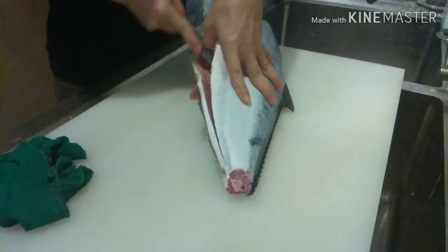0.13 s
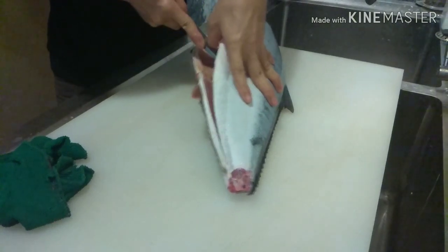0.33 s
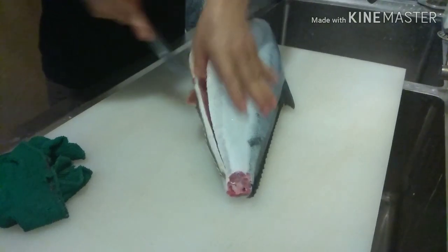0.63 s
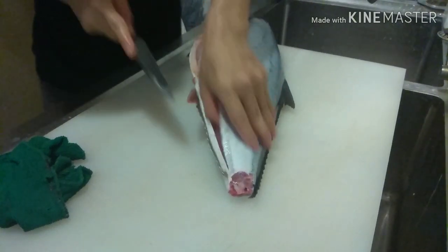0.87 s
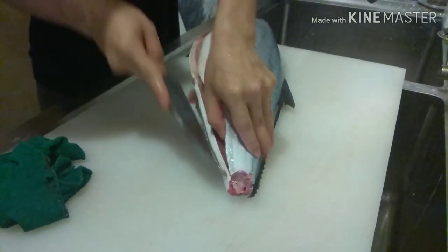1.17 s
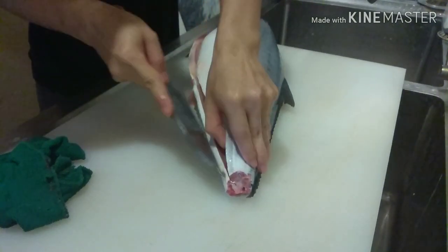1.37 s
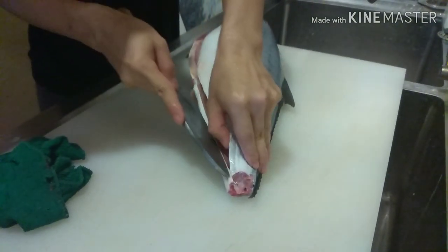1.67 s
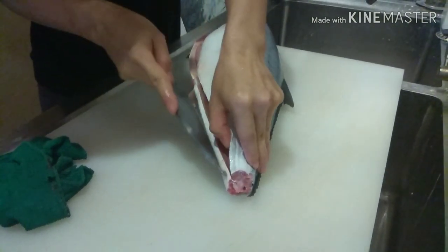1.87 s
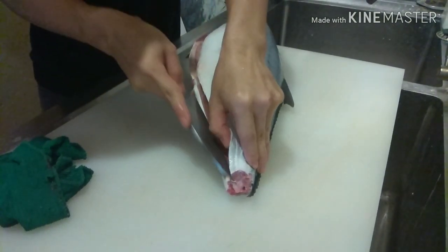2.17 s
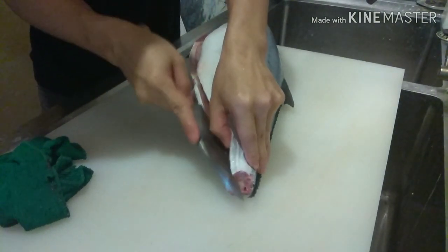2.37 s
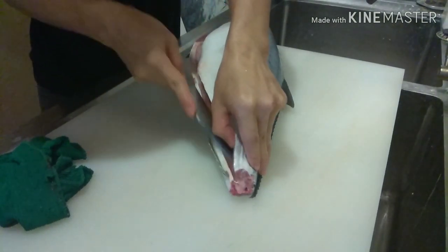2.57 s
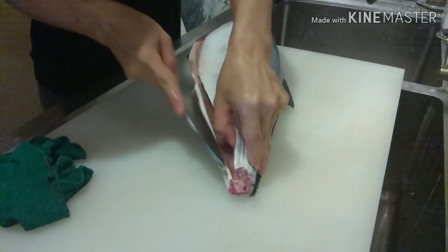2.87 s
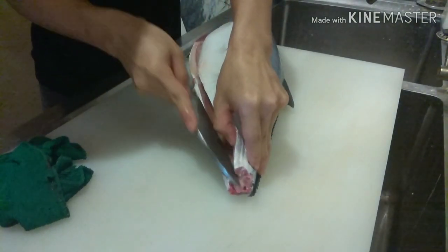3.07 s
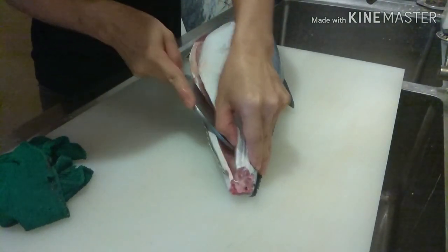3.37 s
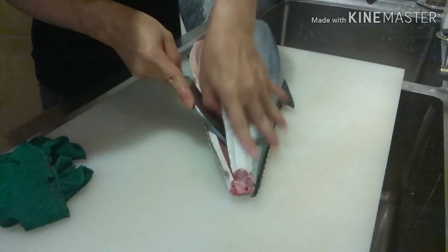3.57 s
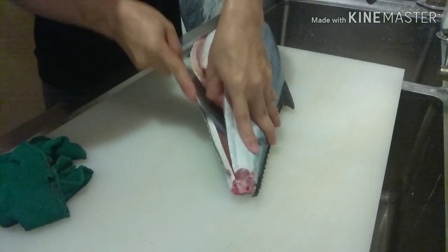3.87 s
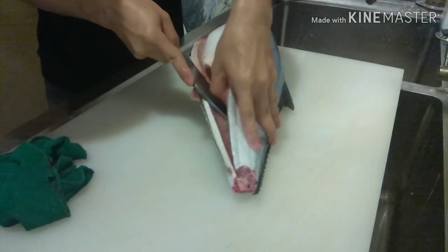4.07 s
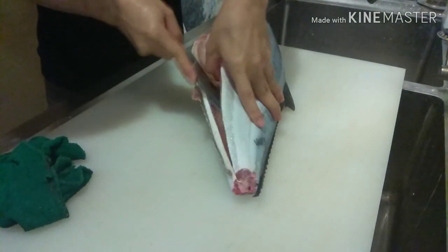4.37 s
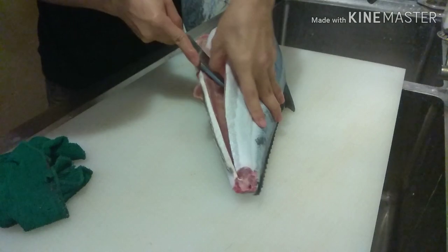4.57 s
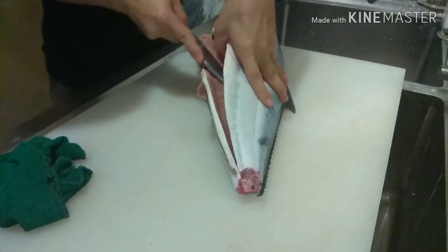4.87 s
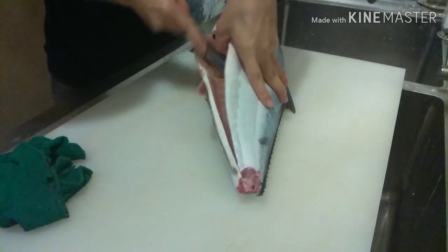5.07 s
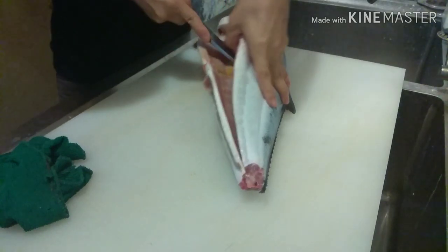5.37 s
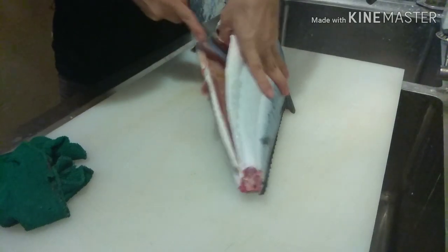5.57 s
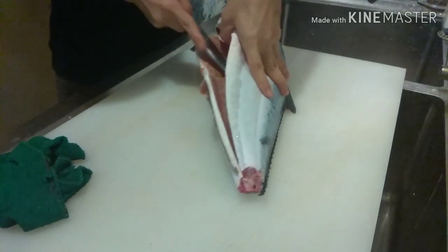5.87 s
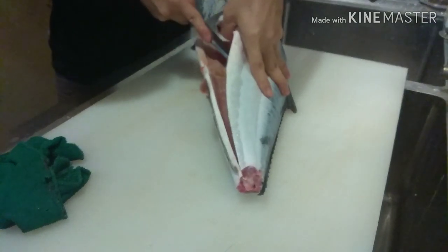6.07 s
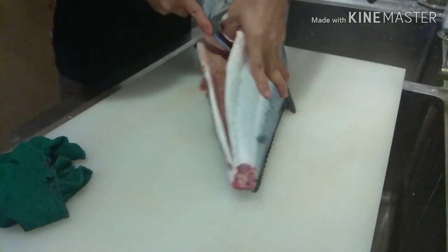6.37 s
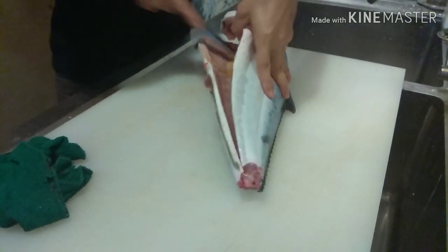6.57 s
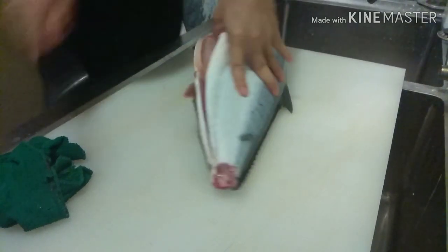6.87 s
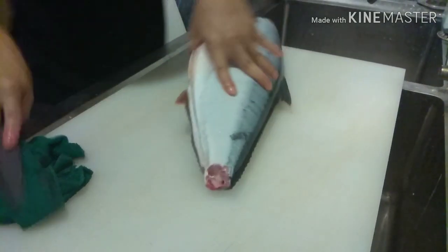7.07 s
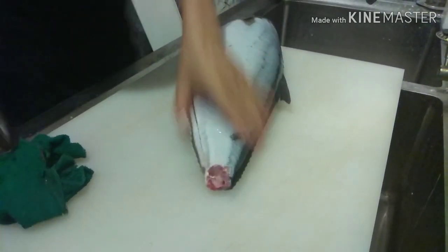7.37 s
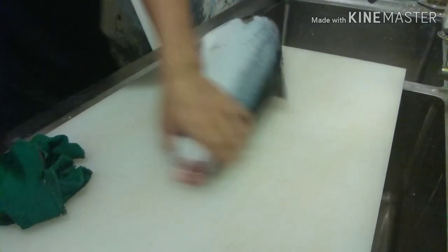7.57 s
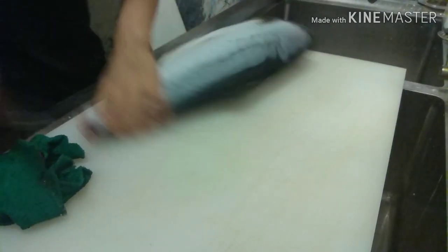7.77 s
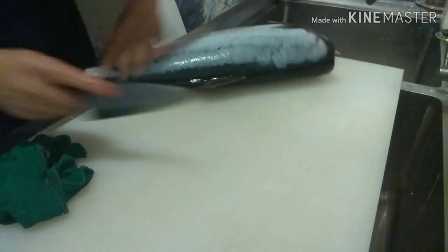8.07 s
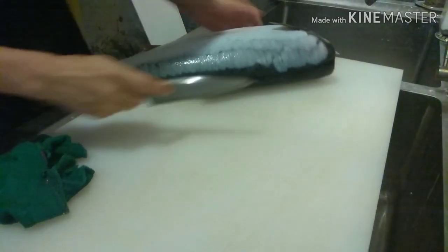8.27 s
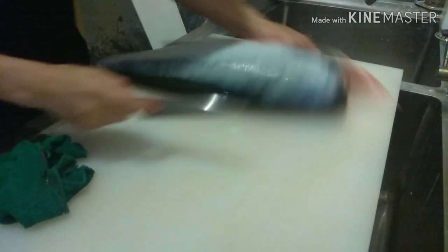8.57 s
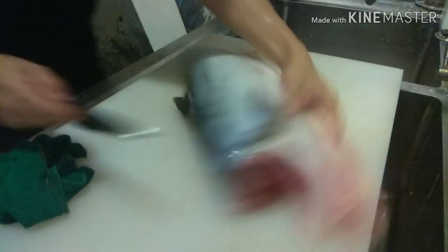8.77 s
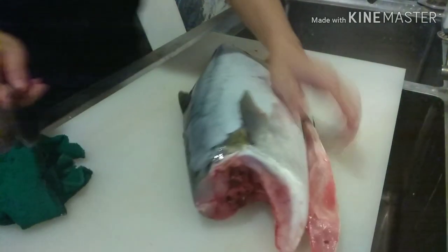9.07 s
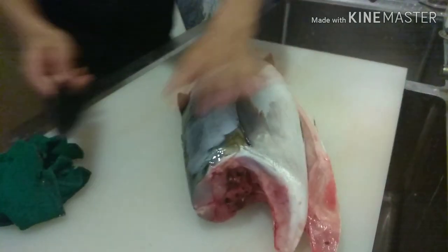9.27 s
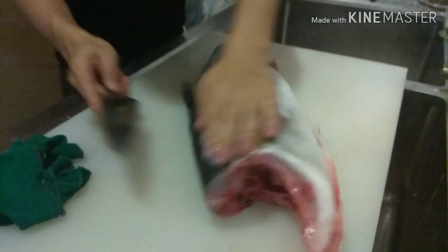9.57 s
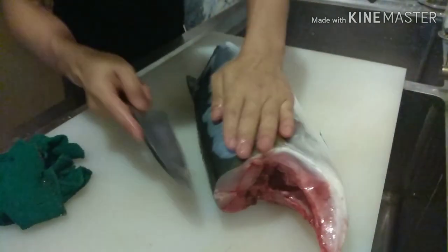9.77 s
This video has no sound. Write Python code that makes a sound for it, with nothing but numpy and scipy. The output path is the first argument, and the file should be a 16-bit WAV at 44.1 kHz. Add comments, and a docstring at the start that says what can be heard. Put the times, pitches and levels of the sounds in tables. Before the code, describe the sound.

Close stereo sound of a fish being boned on a plastic board in a hard-walled kitchen. Crisp bone snaps and short rasping knife strokes come in clusters, with soft low thuds and tiny knocks. A heavier thump is followed by wet skin squeaking as the fish is turned, then faint scrapes. Steady hiss, low rumble and thin hum continue throughout.

```python
"""A fish is boned on a plastic board in a hard-walled kitchen, heard close by two microphones.
Throughout, shaped noise gives hiss and rumble, thin resonances a hum and a whistle that comes and goes.
From the start noise bursts snap bone, torn noise scrapes along the ribs and counter modes thud below;
short damped tones knock and chirp here and there. The heaviest thud falls just after 7 s, wavering tones
squeak as wet skin is turned near 8 s, then faint scrapes follow. Sparse echoes carry the near work."""
import sys
import numpy as np
from scipy import signal
from scipy.fft import irfft
from scipy.io import wavfile
from scipy.ndimage import uniform_filter1d

SR = 44100
rng = np.random.default_rng(int(sys.argv[2]) if len(sys.argv) > 2 else 0)


def dump(signal):
    """Clip the signal to [-1, 1] and save it as 16-bit WAV at the path in sys.argv[1]."""
    limited = np.clip(np.atleast_2d(signal).T, -1, 1)
    pcm = np.round(limited * 32767).astype(np.int16)
    wavfile.write(sys.argv[1], SR, pcm)


def to_linear_factor(level_db):
    """Convert decibel levels (scalar or array-like) to linear amplitude factors."""
    exponent = np.asarray(level_db, float) / 20
    return 10 ** exponent


N = 437472

# spectrum of the room's hiss and rumble: [f/Hz, relative level/dB per Hz]
AIR_SPECTRUM = [(24, -65), (40, -35.5), (69, -27), (203, -5), (260, -9.5), (302, -12), (485, -16),
                (1490, -26), (2280, -23.5), (2590, -27), (4370, -21), (5750, -9), (7750, -1.5), (9710, 1),
                (15600, -13)]
# resonances and hollows on that spectrum: [f/Hz, width/Hz, level against the air/dB]
AIR_RESONANCES = [(212, 40, 4), (2360, 120, 4), (3820, 250, 4), (4750, 140, 6), (5230, 110, 8),
                  (5880, 350, 6), (7150, 400, 5), (4180, 220, -5), (4480, 200, -4), (4980, 250, -8),
                  (5390, 220, -12), (6390, 300, -7), (6770, 90, -9), (7800, 560, -22), (9600, 500, 4),
                  (10880, 130, -9), (11700, 1200, 5), (14570, 130, -10)]
# slow swell of the treble hiss: [t/s, level/dB]
HISS_SWELL = [(0.0, 2.5), (0.47, -0.2), (1.19, 1), (1.46, -0.33), (4.4, 0), (7.68, -0.6), (7.98, 1),
              (8.34, -0.7), (8.79, 0.5), (9.92, -1)]
# depth of the flicker in narrow patches of the air: [f/Hz, rms level/dB]
AIR_FLUTTER = [(1000, 1.2), (2200, 3.2), (5500, 3.2), (8000, 1.5), (15000, 1.5)]
# likeness of the steady sounds at the two microphones: [f/Hz, correlation]
LIKENESS = [(60, 0.98), (250, 0.97), (500, 0.48), (1200, 0.11), (4000, 0.45), (9000, 0.05), (12000, 0.3),
            (15000, 0.15)]
# balance of the steady sounds: [f/Hz, left minus right level/dB]
BALANCE = [(60, 11.5), (110, -1.5), (200, 0), (380, 4), (700, -0.5), (1290, 1), (2380, 0.5), (4400, 4.5),
           (8120, -2), (15000, 13.5)]
# dead spot at the right microphone: [f/Hz, width/Hz, level/dB]
RIGHT_DEAD_SPOT = (12630, 350, -18)
# thin wavering lines of the kitchen appliances: [f/Hz, width/Hz, level/dB]
APPLIANCE_LINES = [(212, 8, -62), (300, 6, -66), (378, 7, -70), (450, 5, -75), (529, 5, -78), (598, 6, -78),
                   (620, 5, -78), (692, 5, -82), (4759, 30, -78), (5873, 30, -72), (7160, 30, -70),
                   (8312, 30, -66), (8839, 30, -65), (8925, 30, -65), (9480, 40, -59), (9668, 50, -58),
                   (10020, 40, -55), (11096, 22, -63), (11337, 25, -60), (11482, 25, -60), (11767, 22, -59),
                   (11906, 25, -58), (12144, 30, -57), (13214, 40, -63)]
# a thin whistle that comes and goes, as on the left: [t/s, level/dB]
WHISTLE_LEVEL = [(0.0, -72), (0.4, -70), (0.55, -87), (3.4, -82), (3.8, -73), (5.0, -74.5), (5.9, -75.5),
                 (6.8, -66.5), (7.2, -75), (8.2, -66), (8.85, -79), (9.0, -66.5), (9.92, -66.5)]
# how fast the room's echoes die: [f/Hz, t60/s]
ROOM_DECAY = [(200, 0.029), (2000, 0.19), (6000, 0.16), (14000, 0.048)]
# modes of the steel counter: [f/Hz, relative level/dB, t60/s]
COUNTER_MODES = [(35.8, 29, 0.37), (68.6, -2, 0.32), (114.8, 1, 0.38), (132.1, 2, 0.34), (169.2, 2.5, 0.22),
                 (190, 2, 0.24), (213.2, 6, 0.17), (272, 4, 0.099)]
# thuds through the counter: [t/s, peak level/dB, f around which it rings/Hz]
COUNTER_THUDS = [(0.055, -33, 213), (0.097, -37, 210), (0.3, -42, 159), (0.714, -38.5, 198),
                 (1.68, -44, 204), (2.649, -37.5, 201), (4.018, -50, 124), (4.067, -46, 130),
                 (4.22, -39.5, 220), (4.274, -38, 204), (4.393, -38.5, 190), (4.453, -42.5, 197),
                 (4.65, -39.5, 126), (5.16, -44, 175), (5.633, -41.5, 197), (6.202, -39, 196),
                 (6.398, -48.5, 121), (6.676, -47.5, 197), (7.193, -27, 129), (7.237, -32, 129),
                 (7.277, -37, 157), (7.36, -44, 126), (9.514, -47, 207)]
# small pitched knocks, chirps and whistle blips: [t/s, level the decay starts from/dB, f/Hz, t60/s]
PITCHED_BLIPS = [(.2, -58, 1890, 0.12), (0.31, -46, 2200, 0.075), (0.768, -40, 1270, 0.057),
                 (1.095, -49, 3014, 0.16), (1.099, -52, 1780, 0.084), (1.235, -52, 2374, 0.089),
                 (1.739, -49, 1730, 0.068), (1.8, -58, 2160, 0.072), (2.35, -45.5, 2263, 0.22),
                 (2.55, -62, 2350, 0.47), (2.78, -49, 2315, 0.096), (2.599, -48, 1760, 0.053),
                 (3.33, -42.5, 2186, 0.074), (4.36, -52, 1777, 0.11), (4.684, -52, 2760, 0.063),
                 (5.14, -50, 2980, 0.077), (5.406, -50.5, 3400, 0.092), (5.41, -55, 2385, 0.3),
                 (5.71, -54.5, 3310, 0.1), (5.929, -55, 2360, 0.47), (6.391, -35.5, 1440, 0.023),
                 (7.19, -51, 850, 0.054), (8.7, -49.5, 2150, 0.2), (8.113, -27, 390, 0.021)]
# squeaks of wet skin over plastic, one curve each: [t/s, f/Hz, level/dB, octave over the tone/dB]
SKIN_SQUEAKS = [
    [(7.712, 1970, -43, 2), (7.722, 2136, -40.5, -10), (7.735, 2440, -39, -22), (7.752, 2140, -56, -13),
     (7.775, 2430, -52, -16), (7.8, 2360, -63, -12)],
    [(7.85, 3037, -48, -9), (7.862, 3010, -34.5, -12), (7.878, 2934, -42.5, 7), (7.892, 2824, -45.5, 2),
     (7.91, 2930, -45, -12), (7.925, 3040, -39, -1), (7.94, 3125, -40, -3), (7.958, 3350, -37, -1),
     (7.978, 3580, -40.5, -15), (8.0, 3450, -38, -2), (8.02, 3454, -40.5, -2), (8.04, 3235, -39.5, 1),
     (8.06, 3120, -38, -12), (8.08, 3003, -44, 3), (8.11, 2710, -50.5, -6), (8.14, 2780, -64, -14),
     (8.2, 2900, -60, -8)],
]
# the open belly of the fish colours the blade: [f/Hz, width/Hz, level/dB]
BELLY = (3720, 950, 7)
# fixed dips in the spectrum of strokes and snaps: [f/Hz, width/Hz, level/dB]
STROKE_SNAP_DIPS = [(3010, 360, -8), (4164, 160, -12), (5460, 190, -12.5), (6250, 170, -10),
                    (7850, 270, -17.5)]
# strokes along flesh and ribs: [loudest t/s, nominal length/s, level/dB, centre f/Hz, spread/octaves]
BLADE_STROKES = [(0.07, 0.17, -52.5, 4950, 0.4), (0.633, 0.11, -41, 7900, 0.13),
                 (0.735, 0.15, -48.5, 5320, 0.26), (0.82, 0.13, -59, 5400, 0.24),
                 (0.898, 0.13, -41, 6320, 0.36), (1.05, 0.19, -48, 6400, 0.33),
                 (1.16, 0.16, -48.5, 6500, 0.45), (4.02, 0.054, -52, 6500, 0.48),
                 (4.62, 0.12, -40.5, 6540, 0.68), (5.149, 0.11, -45.5, 6460, 0.53),
                 (5.463, 0.063, -60, 6240, 0.53), (6.155, 0.064, -53, 4600, 0.27),
                 (6.39, 0.075, -41, 4600, 0.51), (8.72, 0.21, -52.5, 5430, 0.46),
                 (8.83, 0.13, -60, 5300, 0.27), (9.818, 0.14, -55, 4800, 0.28)]
# snaps of bone under the edge: [loudest t/s, level/dB, centre f/Hz]
BONE_SNAPS = [(0.052, -25, 12000), (0.112, -29.5, 10800), (0.305, -31, 9270), (0.713, -34, 9630),
              (2.522, -29, 12400), (2.715, -39, 12400), (3.344, -42, 10200), (3.997, -25.5, 11300),
              (4.5745, -36, 13000), (4.586, -26.5, 11300), (4.628, -27, 10000), (5.146, -29.5, 11500),
              (5.193, -34, 9900), (5.455, -29, 9900), (6.128, -32, 9000), (6.155, -34, 11700),
              (6.384, -24.5, 9000), (6.392, -35, 11500), (6.403, -36, 9000), (7.177, -30, 11650)]
# mute threshold against the usual level of neighbouring bands: [f/Hz, level/dB]
USUAL_THRESHOLD = [(800, -16), (1500, -5), (2600, 0), (5300, 1.5), (6800, -4), (7300, -5), (7800, -1),
                   (8300, -6), (13000, -6.5), (15000, -4)]
# mute threshold against the present level around the band: [f/Hz, level/dB]
PRESENT_THRESHOLD = [(1200, -30), (1600, -7), (2600, -3), (5400, -2.5), (5800, -5.5), (8200, -6),
                     (8600, -30)]

AIR_DB = -35.5  # rms of the whole air
LEFT_LAG = 3  # samples by which the left microphone hears the room later
HALVES = np.array([[.5], [-.5]])  # splits a left-minus-right level between the microphones
WHISTLE_HZ, WHISTLE_WIDTH_HZ, WHISTLE_FLICKER_DB = 1771, 44, 5
NUDGES, NUDGE_DB, NUDGE_HZ = 10, -47.5, 194  # faint thuds as the hands shift the fish
PITCH_WOBBLE, PATCH_SPREAD = 0.024, 0.05  # shares of the squeak's pitch
RASP_DB, RASP_WIDTH_SHARE = -6, 0.1  # rough noise under the squeak; width as a share of its mean pitch
RISE_SHARE, EDGE_DROP_DB = 0.4, -11  # share of a stroke before its peak, level at its nominal ends
DULLING_OCTAVES = 0.031  # fall of a stroke's centre over one nominal length
SNAP_RISE_S, SNAP_FALL_S, SNAP_OCTAVES = 0.0035, 0.0035, 0.4
CRUMBLE_SHARE, CRUMBLE_S = 0.24, 0.056
SNAP_LEFT_DB, SNAP_LEFT_DB_PER_OCTAVE = 7.5, 15  # left minus right at 10 kHz, and its slope
MASK_CAP_DB = 19  # sounds further than this over the usual level mute no more
EDGE_HZ = 15420  # top of the microphone's band


def evened(x):
    """Scales to rms 1."""
    return x / np.sqrt(np.mean(x ** 2) + 1e-20)


def read(points, hz):
    """Reads a spectrum on a log-frequency axis."""
    f, value = np.transpose(points)
    return np.interp(np.log(hz + 1), np.log(f + 1), value)


def resonance_db(rows, hz):
    """Sums resonance-shaped peaks and dips, in dB."""
    return sum(db / (1 + (2 * (hz - f) / width) ** 2) for f, width, db in rows)


def add(mix, s, sound):
    """Mixes a sound in at s seconds."""
    part = mix[..., max(round(s * SR), 0):][..., :sound.shape[-1]]
    part += sound[..., :part.shape[-1]]


def wander(count, size):
    """Slow chance of rms 1, smoothed twice over size samples."""
    return evened(uniform_filter1d(uniform_filter1d(rng.standard_normal(count), size), size))


def narrow(width_hz, turns):
    """Two channels of noise in one narrow resonance that follows the given phase turns; rms 1."""
    r = np.exp(-np.pi * width_hz / SR)
    drift = rng.standard_normal((2, len(turns))) + 1j * rng.standard_normal((2, len(turns)))
    drift = signal.lfilter([1], np.convolve([1, -r], [1, -r]), drift)
    return evened((drift * np.exp(2j * np.pi * turns)).real)


def air():
    """Random short-time spectra through fixed resonances; narrow patches flutter, the treble swells."""
    frames, hz = N // 512 + 5, np.fft.rfftfreq(2048, 1 / SR)
    a, b, c, d, patches = rng.standard_normal((frames, 1025, 5)).T
    patches = evened(uniform_filter1d(uniform_filter1d(patches, size=6, axis=0), size=8, axis=1))
    shape_db = read(AIR_SPECTRUM, hz) + resonance_db(AIR_RESONANCES, hz)
    s, swell_db = np.transpose(HISS_SWELL)
    swell_db = np.interp(np.arange(frames) * 512 / SR, s, swell_db) + 0.47 * wander(frames, size=2)

    same = np.clip(read(LIKENESS, hz), -1, 1)[:, None]
    left = a + 1j * b
    right = same * left + np.sqrt(1 - same ** 2) * (c + 1j * d)
    late = np.exp(-2j * np.pi * hz * LEFT_LAG / SR)[:, None]
    z = np.array([left * late, right])

    # standing waves give each microphone its own fixed ripple
    ripple_db = 1.3 * np.array([wander(1025, size=2), wander(1025, size=2)])
    side_db = HALVES * read(BALANCE, hz) + ripple_db
    side_db[1] += resonance_db([RIGHT_DEAD_SPOT], hz)
    flutter_db = read(AIR_FLUTTER, hz)[:, None] * patches
    treble_db = (hz > 1500)[:, None] * swell_db
    z *= to_linear_factor(shape_db[:, None] + flutter_db + treble_db) * to_linear_factor(side_db)[:, :, None]
    sound = signal.istft(z, nperseg=2048, noverlap=1536)[1][:, 1024:N + 1024]
    return to_linear_factor(AIR_DB) * evened(sound)


def hum():
    """Noise in many thin resonances; the lowest lines are much alike at both microphones, high ones less."""
    hz = np.fft.rfftfreq(N, 1 / SR)
    power = sum(to_linear_factor(2 * db) / width / np.square(1 + np.square(2 * (hz - f) / width))
                for f, width, db in APPLIANCE_LINES)
    a, b, c, d = rng.standard_normal((4, len(hz)))
    same = np.clip(read(LIKENESS, hz), -1, 1)
    left = a + 1j * b
    z = np.array([left, same * left + np.sqrt(1 - same ** 2) * (c + 1j * d)])
    z *= to_linear_factor(HALVES * read(BALANCE, hz)) * np.sqrt(power * N * SR / np.pi)
    return irfft(z, N)


def whistle():
    """Noise in one narrow resonance with a flickering level, stronger on the right."""
    t = np.arange(N) / SR
    tone = narrow(WHISTLE_WIDTH_HZ, WHISTLE_HZ * t)
    level_db = np.interp(t, *np.transpose(WHISTLE_LEVEL)) + WHISTLE_FLICKER_DB * wander(N, size=2500)
    return to_linear_factor(level_db + np.array([[0.], [5.]])) * tone


def kitchen(x):
    """Sparse echoes of random sign off the walls, each band dying at its own speed."""
    taps = np.zeros((2, SR // 2))
    at = np.arange(200, SR // 2 - 20, 20) + rng.integers(0, 20, (2, (SR // 2 - 201) // 20))
    np.put_along_axis(taps, at, rng.choice([-1., 1.], at.shape), 1)
    hz, t, z = signal.stft(taps, SR, nperseg=256)
    decay = to_linear_factor(-60 * t / read(ROOM_DECAY, hz)[:, None])
    tail = signal.istft(z * decay, SR, nperseg=256)[1]
    return signal.fftconvolve(x, tail / np.linalg.norm(tail[0]), axes=1)[:, :N]


def thuds():
    """A soft push rings most those modes of the counter that lie near its own pitch."""
    out, t = np.zeros(N), np.arange(SR // 2) / SR
    nudges = [(when * N / SR, NUDGE_DB + 3.5 * (size - .5), NUDGE_HZ)
              for when, size in rng.random((NUDGES, 2))]
    chance = rng.random((len(COUNTER_THUDS) + NUDGES, len(COUNTER_MODES)))
    for (s, db, centre_hz), luck in zip(COUNTER_THUDS + nudges, chance):
        ring = np.zeros(len(t))
        for (hz, level_db, t60), detune in zip(COUNTER_MODES, luck):
            mode_db = level_db - 27.0 * abs(np.log2(centre_hz / hz)) - 60 * t / t60
            ring += to_linear_factor(mode_db) * np.sin(2 * np.pi * hz * (.96 + 0.12 * detune) * t)
        ring *= 1 - np.exp(-(t / 0.018) ** 2)  # flesh cushions the blow
        add(out, s - .015, to_linear_factor(db) * ring / abs(ring).max())
    return out


def pitched_blips():
    """One damped, slightly unsteady mode each, with a soft start."""
    out, t = np.zeros(N), np.arange(8000) / SR
    for s, db, hz, t60 in PITCHED_BLIPS:
        turns = np.cumsum(hz * (1 + 0.035 * wander(len(t), size=200))) / SR
        onset = 1 - np.exp(-(t / (.07 * t60)) ** 2)
        add(out, s - .005, to_linear_factor(db - 60 * t / t60) * np.sin(2 * np.pi * turns) * onset)
    return out


def unroll(rows):
    """Curve rows to time and columns at the sample rate."""
    s, *columns = np.transpose(rows)
    t = np.arange(s[0], s[-1], 1 / SR)
    return [t] + [np.interp(t, s, c) for c in columns]


def squeak(rows):
    """Three patches of skin stick and slip at near, wobbling rates with uneven grip, over a rasp."""
    t, hz, db, octave_db = unroll(rows)
    tone = 0
    for offset, share_db in ((0, 0), (-1, -5.5), (1, -7.5)):
        rate = 1 + offset * PATCH_SPREAD + PITCH_WOBBLE * wander(len(t), size=120)
        turns = np.cumsum(hz * rate) / SR
        grip = to_linear_factor(share_db + 1.7 * wander(len(t), size=200))
        tone = tone + grip * (np.sin(2 * np.pi * turns) + to_linear_factor(octave_db) * np.sin(4 * np.pi * turns))
    slips = np.cumsum(hz) / SR
    width_hz = RASP_WIDTH_SHARE * hz.mean()
    rasp = narrow(width_hz, slips)[0] + to_linear_factor(octave_db) * narrow(2 * width_hz, 2 * slips)[0]
    tone = tone + to_linear_factor(RASP_DB) * rasp
    return t[0], to_linear_factor(db) * tone * signal.windows.tukey(len(t), .08)


def colour(x, centre_hz, octaves):
    """Keeps a bell-shaped band around a centre that may move, with the belly's colour and the fixed dips."""
    hz, t, z = signal.stft(x, SR, nperseg=256, noverlap=192)
    at = np.minimum((t * SR).astype(int), x.shape[-1] - 1)
    centre_hz, octaves = (np.broadcast_to(c, x.shape[-1:])[at] for c in (centre_hz, octaves))
    away = np.log2((hz[:, None] + 1) / centre_hz)
    bell = np.exp(-.5 * (away / np.clip(octaves, .15, 2)) ** 2)
    bell *= to_linear_factor(resonance_db([BELLY] + STROKE_SNAP_DIPS, hz[:, None]))
    # slow random ripple favours some narrow bands for a few hundredths of a second
    ripple = uniform_filter1d(rng.standard_normal((len(t), len(hz))), size=60, axis=0)
    ripple = uniform_filter1d(ripple, size=2, axis=1)
    bell *= to_linear_factor(4.0 * evened(ripple).T)
    bell /= np.sqrt((bell ** 2).mean(0))  # white noise of rms 1 keeps about that level
    return signal.istft(z * bell, SR, nperseg=256, noverlap=192)[1][..., :x.shape[-1]]


def stroke(peak_s, length, db, centre_hz, octaves):
    """Dense tiny tears of uneven size, in clumps, as the blade's pressure swells and lets go."""
    # runs on to twice the nominal length, fading ever faster
    t = np.arange(-2 * RISE_SHARE * length, 2 * (1 - RISE_SHARE) * length, 1 / SR)
    away = np.where(t < 0, -t / RISE_SHARE, t / (1 - RISE_SHARE)) / length
    sizes_db = 5.0 * np.minimum(rng.exponential(1, len(t)), 5) + 3.5 * wander(len(t), size=160)
    tears = rng.standard_normal((2, len(t))) * evened(to_linear_factor(sizes_db))  # different at each microphone
    tears = colour(tears, centre_hz / 2 ** (DULLING_OCTAVES * t / length), octaves)
    return peak_s + t[0], to_linear_factor(db + EDGE_DROP_DB * away ** 1.7) * tears


def snaps():
    """Each snap is a noise burst that swells for a few milliseconds, then falls with a crumbling tail."""
    out, t = np.zeros((2, N)), np.arange(-512, 3584) / SR
    noise = rng.standard_normal((len(BONE_SNAPS), 2, 4096))
    fall = np.exp(-t / SNAP_FALL_S) + CRUMBLE_SHARE * np.exp(-t / CRUMBLE_S)
    shape = np.where(t < 0, np.exp(t / SNAP_RISE_S), fall / (1 + CRUMBLE_SHARE))
    for (s, db, centre_hz), pair in zip(BONE_SNAPS, noise):
        grit_db = 1.5 * np.minimum(rng.exponential(1, 4096), 4) + 2.0 * wander(4096, size=40)
        burst = colour(pair * evened(to_linear_factor(grit_db)), centre_hz, SNAP_OCTAVES) * shape
        # brighter snaps lean further left
        pan_db = SNAP_LEFT_DB + SNAP_LEFT_DB_PER_OCTAVE * np.log2(centre_hz / 10 ** 4)
        add(out, s + t[0], to_linear_factor(db + pan_db * HALVES) * burst)
    return out


def scene():
    """Near sounds, their echoes and the steady air."""
    blade, skin = snaps(), np.zeros(N)
    for row in BLADE_STROKES:
        add(blade, *stroke(*row))
    for rows in SKIN_SQUEAKS:
        add(skin, *squeak(rows))
    skin += pitched_blips()
    skin = np.array([np.roll(skin, LEFT_LAG), skin])
    echoes = kitchen(to_linear_factor(-4.0) * blade + skin)
    near = blade + to_linear_factor(-8) * skin  # squeaks and blips reach the microphones mostly as echoes
    counter = thuds() * to_linear_factor(np.array([[.6], [-.6]]))
    return near + echoes + counter + whistle() + hum() + air()


def gate(x):
    """Mutes, frame by frame, narrow bands too far under the usual or the present level around them."""
    hz, t, z = signal.stft(x, SR, nperseg=2048)
    # bands of four bins, both microphones together
    power = (abs(z[:, :1024]) ** 2).reshape(2, 256, 4, -1).mean((0, 2)) + 1e-20
    band_db, hz = 10 * np.log10(power), hz[2:1024:4]
    usual_db = uniform_filter1d(np.median(band_db, axis=1), size=13) + read(USUAL_THRESHOLD, hz)
    around_db = 10 * np.log10(abs(uniform_filter1d(power, size=13, axis=0)) + 1e-20)
    around_db = np.minimum(around_db, np.median(around_db, axis=1)[:, None] + MASK_CAP_DB)
    around_db = around_db + read(PRESENT_THRESHOLD, hz)[:, None]
    muted = (band_db < usual_db[:, None]) | (band_db < around_db)
    z[:, :1024] *= np.repeat(np.where(muted, .01, 1), 4, axis=0)  # muted bands drop by 40 dB
    return signal.istft(z, SR, nperseg=2048)[1][:, :N]


def low_pass(x):
    """Removes everything above the highest recorded frequency."""
    return signal.sosfilt(signal.butter(12, 16430, fs=SR, output="sos"), x)


def record(dry):
    """The band limit of the microphone, then the muting of weak narrow bands, give the finished mix."""
    edge = signal.firwin(511, EDGE_HZ, window=("kaiser", 9), fs=SR)
    mix = gate(signal.oaconvolve(dry, edge[None], "same"))
    return low_pass(mix)


dry = scene()
out = record(dry)
dump(out)
```